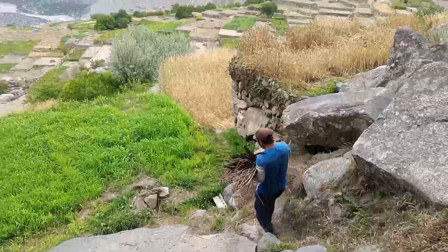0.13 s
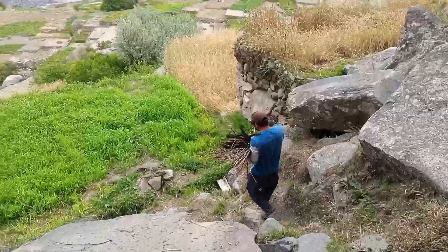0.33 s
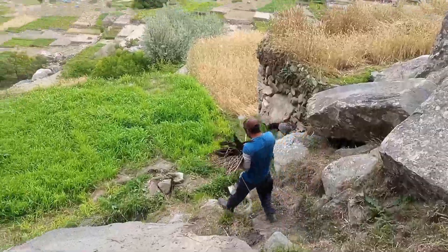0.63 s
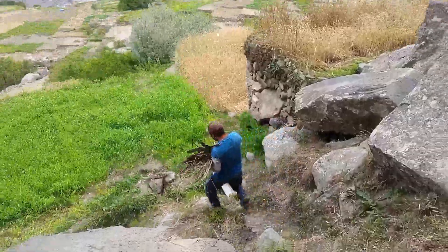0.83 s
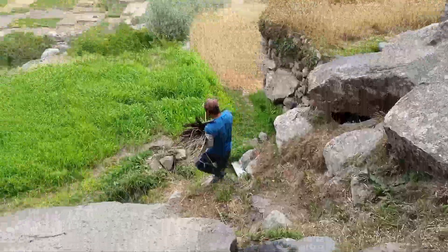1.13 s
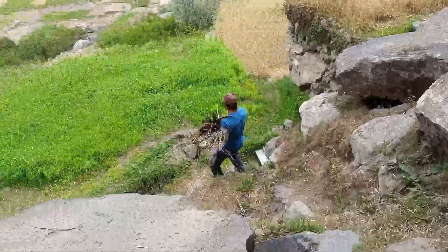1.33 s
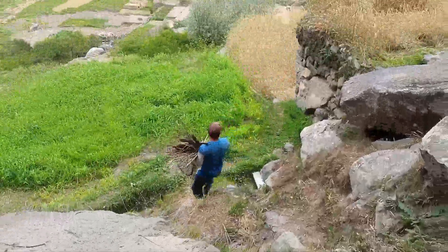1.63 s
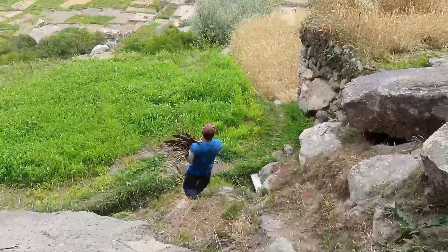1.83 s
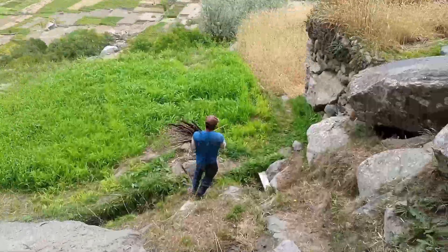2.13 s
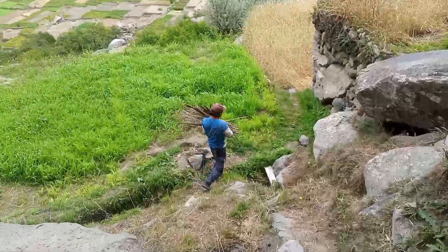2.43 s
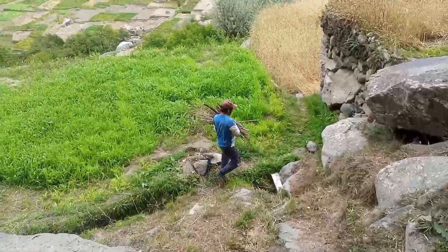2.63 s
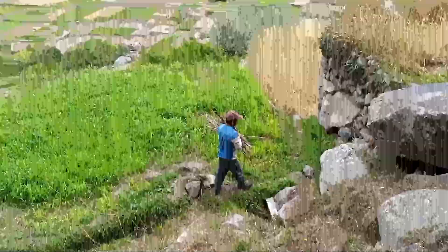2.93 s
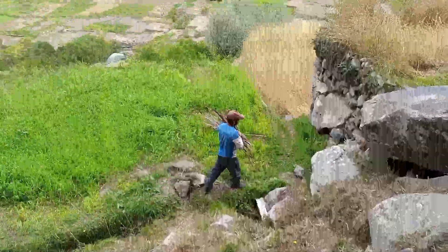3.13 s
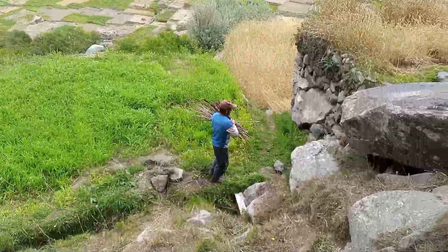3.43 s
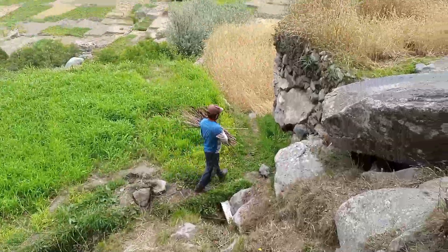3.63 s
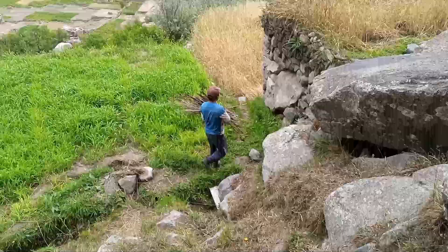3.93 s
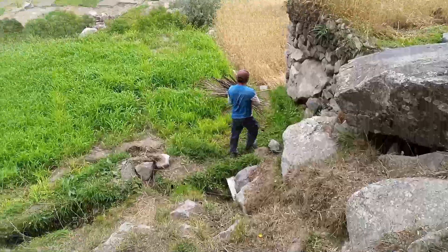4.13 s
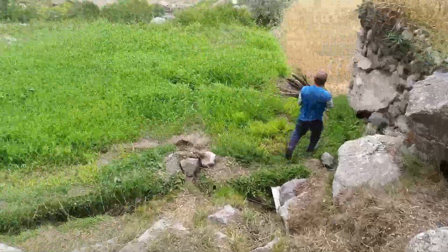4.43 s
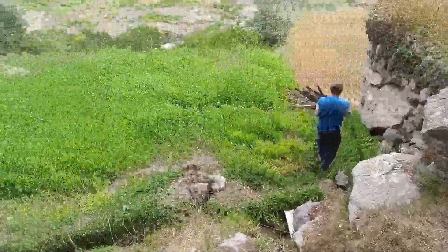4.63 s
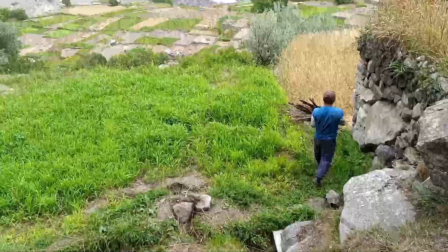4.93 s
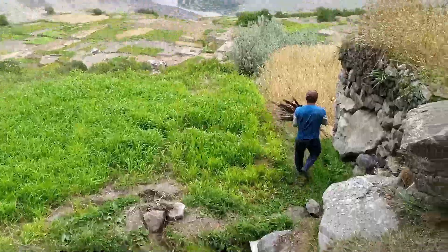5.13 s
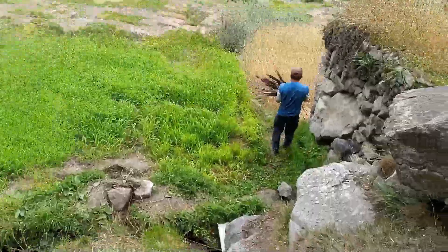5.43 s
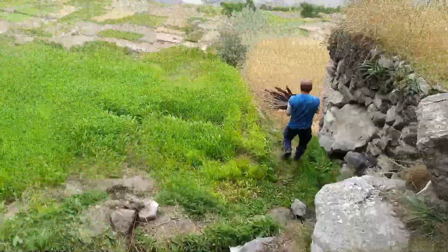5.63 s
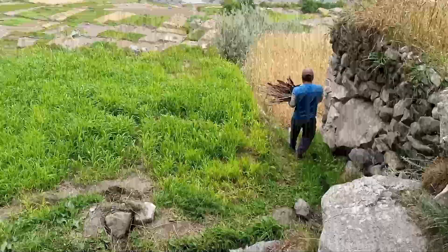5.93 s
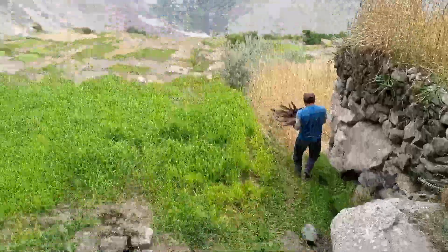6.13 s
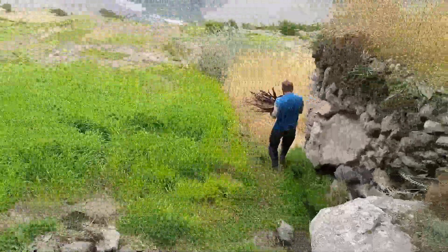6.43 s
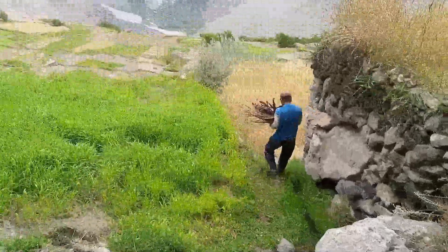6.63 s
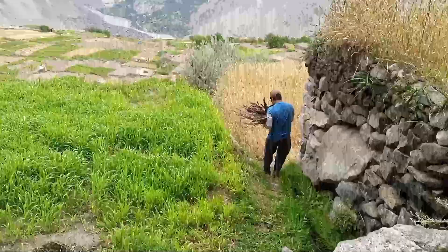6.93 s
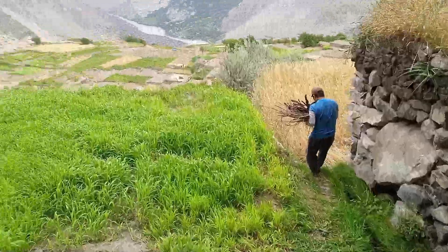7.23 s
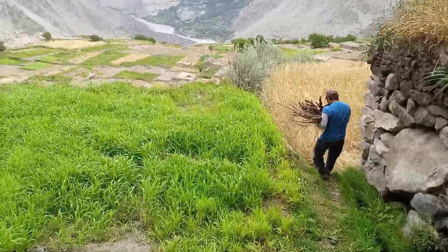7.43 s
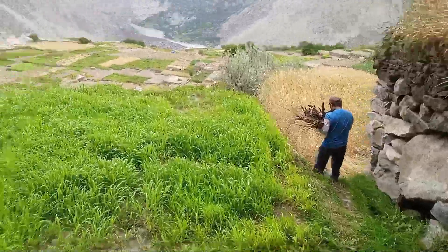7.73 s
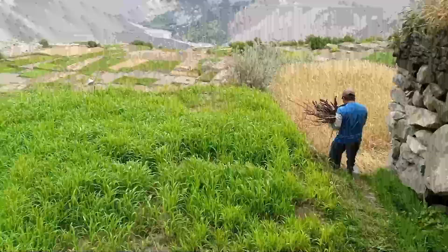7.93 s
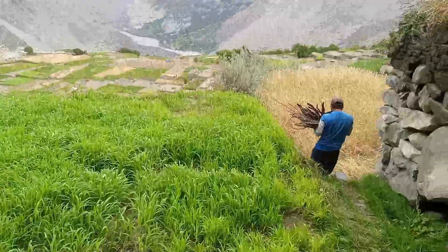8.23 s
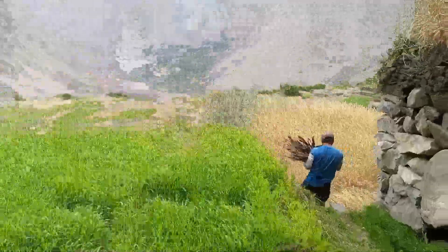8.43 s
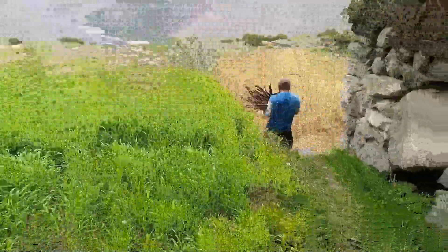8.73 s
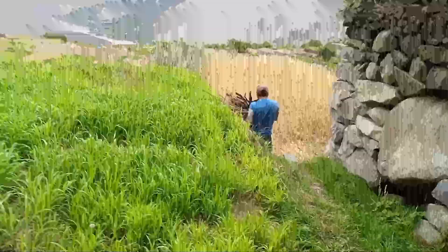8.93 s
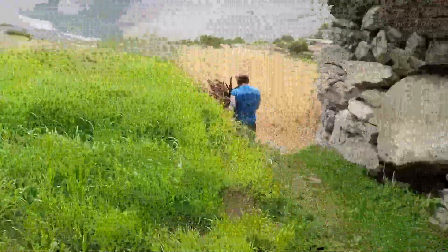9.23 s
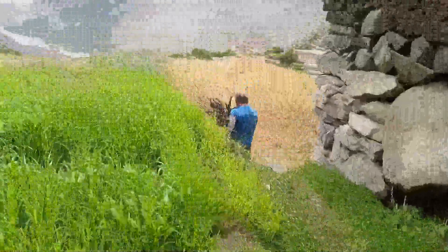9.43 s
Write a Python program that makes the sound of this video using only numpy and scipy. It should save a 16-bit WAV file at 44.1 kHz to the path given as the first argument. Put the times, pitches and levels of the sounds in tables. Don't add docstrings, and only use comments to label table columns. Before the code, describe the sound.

A close single microphone, handheld outdoors on a stony slope, with a very faint steady hush of distant wind and water. From 0 to 1.3 seconds, low footfall thumps and a handling shake mix with light dry scrapes and a sharp tick. From 1.4 to 2.9 it is nearly quiet, just thin grass rustle and one small twig snap. A pebble knocks at 2.9; from 3.5 stems flick, and from 4.2 to 4.7 they rasp and ring. Scrapes, small squeaks and dull knocks continue from 5, with a bright chattering drag around 5.9 and raking stalks from 6.3 to 6.9. At 7.05 comes the loudest, sharpest crack, a stiff stalk breaking. Twig snaps follow, a dry crunch at 7.8, then a cluster of knocks, thumps and crackles around 8.5. Rustling thickens into a full hiss by 9.5, with a heavy thump and knocks near 9.15.

```python
import sys
import numpy as np
from scipy import signal
from scipy.fft import rfft, irfft, next_fast_len
from scipy.io import wavfile
from scipy.ndimage import uniform_filter1d

SR = 44100
rng = np.random.default_rng(int(sys.argv[2]) if len(sys.argv) > 2 else 0)


def bounce(signal):
    frames = np.transpose(np.atleast_2d(signal))
    limited = np.clip(frames, -1, 1)
    pcm = np.round(limited * 32767).astype(np.int16)
    wavfile.write(sys.argv[1], SR, pcm)


def invert_db(level):
    return 10 ** (np.asarray(level, dtype=float) / 20)


N = 422919

# time in seconds, rustle level in dB, dry tips in dB above the rustle.
GRASS_BRUSH = [(0.1, -71.5, 2), (0.53, -58.5, -16), (0.96, -64, -1), (1.22, -65.5, 3), (1.75, -61.5, -19),
               (2.44, -66, -6), (4.15, -60, -26), (4.39, -60.5, 6), (4.84, -58, -9), (5.16, -56.5, -10),
               (5.72, -59, 9.5), (6.2, -56, -3), (6.5, -55, 5.5), (7.02, -55, -19), (7.26, -50, -5),
               (7.8, -53, 7), (8.51, -49, 2.5), (9.55, -45, -1)]
# frequency in Hz, density in dB per Hz.
BLADE_SPECTRUM = [(180, -12.5), (300, -13.5), (653, -7), (797, -9), (1170, -7), (1500, -5), (2150, -2.5),
                  (2500, -1.5), (5530, -3), (6640, -1.5), (7960, -6), (10400, -4), (13100, -16),
                  (14700, -10.5), (15700, -4)]
# time in seconds, fade in seconds, heavy blades in dB, dry tips in dB.
FLATTENED_TUFTS = [
    (1.33, 0.11, -67, -80),
    (4.39, 0.23, -67.5, -56),
    (5.16, 0.044, -51, -58),
    (6.62, 0.12, -59.5, -56),
    (7.07, 0.0084, -59, -51),
    (7.79, 0.04, -51, -44),
    (8.51, 1, -62.5, -64),
]
HEAVY_DB, HEAVY_FOLLOWS = -72, 0.61
SMOOTH_FROM_DB, SMOOTH_OVER_DB = -57.5, 10.5

# frequency in Hz, level in dB.
STALK_MODES = [
    [(4700, -6.5), (5800, -7), (6930, -1), (7580, -6), (9030, -3.5), (10100, -12), (14900, -7)],
    [(1750, -1.5), (2270, 3), (2690, 0.5), (3300, 3), (3720, 1), (4950, 3.5), (5780, 6.5), (6350, 2),
     (7000, -1), (10000, -1)],
    [(3490, 6), (3740, 4), (3990, 3.5), (4800, -7), (6610, -17), (8920, -2), (9520, -12), (10100, -8),
     (11000, -13)],
    [(3090, 1.5), (3500, 1.5), (3790, -2), (6520, -4), (7050, -1), (9160, -1.5), (10100, 3)],
    [(1780, -6), (2500, 2), (4010, 6), (7500, 0), (9350, 1), (15100, -1)],
    [(1530, -9), (2860, -5), (3995, 5), (4760, -8), (5780, -3), (2240, -9), (7100, -6), (9600, -6.5),
     (10300, -12), (10940, -8), (15000, -5)],
    [(1650, -3.5), (2200, 1), (2600, 3), (3980, 6.5), (5800, 2), (7000, -14), (15200, -13)],
    [(1500, 5), (2030, 1), (3000, 2), (2605, 5), (4280, 1), (5170, 1), (6660, 1), (8430, 3), (10800, -13),
     (12360, -6), (14500, 0), (15100, 4)],
    [(608, 3), (1640, 3), (3600, 3), (4000, 2), (5780, -4), (6590, 3)],
    [(1680, -7), (4111, 1), (4760, 7), (5600, -1), (7100, -8), (9300, -4), (10400, 3), (11000, 0)],
]
# strongest moment in seconds, length in seconds, level in dB, ringing share from 0 to 1.
STALK_DRAGS = [
    [(.05, 0.03, -53, 0.6), (.07, 0.053, -62, 0.3), (.122, 0.037, -59, .5), (.165, 0.069, -52.5, 0.4),
     (.275, 0.055, -59.5, 0.6), (.4, 0.26, -63.5, 0.5)],
    [(.685, 0.07, -52.5, 0.8), (.82, 0.28, -60.5, 0.2), (.965, 0.13, -58.5, 0.2), (1.095, 0.12, -62.5, 0.4),
     (1.162, 0.057, -52.5, 0.4)],
    [(3.59, 0.087, -52, 0.84), (3.67, 0.18, -66, 1)],
    [(4.197, 0.033, -56, 0.5), (4.415, 0.067, -57.5, 1), (4.35, 0.094, -63, 0.8), (4.494, 0.04, -55.5, 1),
     (4.575, 0.049, -52, 0.7), (4.675, 0.098, -58, 0.4)],
    [(5.125, 0.091, -52, 0.3), (5.395, 0.043, -63, 0.3), (5.7, 0.071, -62, 0.2)],
    [(5.905, 0.057, -49.5, 0.85), (6.02, 0.097, -50, 1)],
    [(6.38, 0.079, -59, 0.6), (6.57, 0.041, -52, 0.7), (6.8, 0.35, -60.5, 1)],
    [(7.038, 0.019, -45, 0.3), (7.064, 0.043, -36.5, 0.64), (7.091, 0.03, -41, 0.45)],
    [(8.55, 0.1, -46.5, 0.28), (8.475, 0.077, -47.5, 0.06), (9.145, 0.17, -54.5, 1)],
    [(5.72, 0.13, -55.5, 0.8), (5.64, 0.066, -55.5, 0), (5.77, .06, -57, .2)],
]
RISE_SHARE = 0.6
MODE_WIDTH_HZ, MODE_WIDENS = 43, 0.0083
MODE_SCATTER_DB = 3

# time in seconds, peak level in dB.
FLICK_SLIPS = [
    (.1166, -41),
    (.136, -41),
    (.16, -37),
    (.172, -38),
    (.186, -46),
    (.2683, -48),
    (.284, -49),
    (.395, -48),
]
COMB_SLIPS = [(.6714, -38), (.679, -41), (.70, -40), (.8584, -39), (.9078, -42), (.9358, -42), (.956, -41),
              (.99, -41), (1.0011, -38), (1.0485, -42), (1.0899, -43), (1.1408, -40), (1.166, -43)]
NUDGE_SLIPS = [(3.5253, -45), (3.5462, -42), (3.5717, -39), (3.581, -37), (3.591, -37), (3.601, -42),
               (3.666, -47), (3.7148, -38.5), (3.7832, -47), (3.8435, -47), (3.974, -41), (4.014, -45),
               (4.1374, -36)]
RASP_SLIPS = [(4.2633, -39), (4.2867, -36.5), (4.331, -36), (4.341, -35), (4.3705, -38), (4.3636, -37),
              (4.376, -36), (4.399, -41), (4.405, -40), (4.418, -40), (4.4434, -37), (4.4808, -36),
              (4.4923, -37), (4.5422, -40), (4.564, -37), (4.5726, -28.5), (4.58, -40), (4.623, -42),
              (4.6589, -43), (4.669, -44), (4.681, -45), (4.7013, -39)]
TUG_SLIPS = [(4.9878, -41), (5.021, -35), (5.0891, -35), (5.1035, -33), (5.145, -38), (5.197, -40),
             (5.212, -46), (5.315, -47), (5.3335, -39), (5.348, -42), (5.3854, -34), (5.408, -35.5),
             (5.4408, -41), (5.4632, -44)]
CHATTER_SLIPS = [(5.8747, -27), (5.892, -24.5), (5.899, -25), (5.9098, -26), (5.9215, -28), (5.9305, -26),
                 (5.9375, -27.5), (5.9695, -37), (5.9808, -29), (5.9963, -40), (6.008, -24), (6.0232, -27),
                 (6.0354, -25), (6.041, -24)]
RAKE_SLIPS = [(6.3308, -35), (6.372, -39), (6.3797, -40), (6.397, -41), (6.4446, -35), (6.5149, -33),
              (6.5545, -36), (6.5698, -28.5), (6.585, -33), (6.6416, -33.5), (6.6805, -33), (6.7025, -34),
              (6.7434, -37), (6.7723, -36), (6.79, -44), (6.8202, -34), (6.8626, -36), (6.903, -38),
              (6.917, -41)]
BREAK_SLIPS = [
    (7.0487, -36),
    (7.0525, -31),
    (7.056, -27),
    (7.0604, -24),
    (7.0645, -25),
    (7.0698, -25),
    (7.0842, -26.5),
    (7.0894, -28),
]
# slips, peak over rms in dB, ringing share from 0 to 1.
STALK_SLIPS = [(FLICK_SLIPS, 14, 0.68), (COMB_SLIPS, 14, 0.25), (NUDGE_SLIPS, 14, 0.45), (RASP_SLIPS, 14, 0.64),
               (TUG_SLIPS, 14, 0.3), (CHATTER_SLIPS, 14, 0.56), (RAKE_SLIPS, 14, 0.3), (BREAK_SLIPS, 10, 0.41)]

# time in seconds, peak level in dB, body frequency in Hz, tip frequency in Hz.
TWIG_SNAPS = [(1.969, -43, 4970, 9350), (2.968, -48, 1290, 8400), (3.742, -43.5, 1790, 10500),
              (3.869, -37, 2610, 7600), (3.883, -38.5, 3550, 6050), (3.905, -44, 3550, 10400),
              (4.005, -41.5, 4460, 5500), (4.2635, -43, 3800, 7400), (4.337, -37, 3860, 9900),
              (4.401, -40, 3770, 8640), (4.702, -43.5, 4000, 6170), (5.773, -44, 2570, 7000),
              (5.8527, -41, 2200, 10100), (6.123, -38, 2820, 6300), (6.38, -36, 4050, 7100),
              (6.5142, -41, 3970, 5710), (6.554, -35.5, 2470, 5650), (6.6816, -39.5, 4100, 7300),
              (7.223, -36.5, 2000, 6460), (7.3758, -33, 2000, 8670), (7.602, -39.5, 2010, 6610),
              (8.0485, -37.5, 2820, 6500), (8.347, -33.5, 3980, 6460), (9.279, -36, 4160, 5460),
              (9.3817, -34, 4530, 6440), (9.4195, -34, 3580, 6600)]
TWIG_CRACK_DB, TWIG_RUB_S = 1.5, 0.011
# time in seconds, peak level in dB, body frequency in Hz, rub time in seconds.
PEBBLE_KNOCKS = [(2.9335, -30.5, 2020, 0.0033), (4.057, -33.5, 4540, 0.018), (4.4433, -44, 3870, .009),
                 (5.1279, -33, 1050, 0.0049), (5.3016, -34.5, 1970, 0.024), (5.464, -30.5, 2370, 0.029),
                 (5.633, -32, 1660, 0.022), (5.7034, -34, 4130, .01), (6.57, -27, 3900, .004),
                 (6.8204, -34.5, 1410, 0.039), (7.3758, -37, 2020, 0.026), (7.782, -28, 1290, 0.015),
                 (8.26, -32, 3600, 0.003), (8.4554, -22, 1750, 0.0053), (8.5135, -30, 3480, .009),
                 (8.5373, -29, 1156, 0.019), (8.6764, -34, 3870, 0.0081), (9.141, -25.5, 1885, 0.003),
                 (9.17, -27.5, 3950, .009)]
PEBBLE_CRACK_DB, PEBBLE_TIP_HZ = -24, 5850
SNAP_WIDTH_HZ = 117

# start in seconds, end in seconds, first frequency in Hz, last frequency in Hz, level in dB.
SLIDING_SQUEAKS = [(5.137, 5.277, 1760, 1810, -56.5), (5.305, 5.35, 2200, 2350, -54.5),
                   (5.31, 5.395, 1850, 2100, -60.5), (4.99, 5.03, 2560, 2550, -63),
                   (5.497, 5.602, 4450, 4480, -64), (5.722, 5.8, 2533, 2500, -61),
                   (5.875, 5.928, 1000, 1200, -60.5), (5.965, 6.057, 1450, 1670, -52),
                   (6.44, 6.55, 4050, 3930, -62), (6.69, 6.93, 4150, 3950, -59.5),
                   (5.075, 5.14, 2750, 1950, -55.5), (7.03, 7.044, 2600, 2650, -41),
                   (7.085, 7.142, 1230, 1180, -54), (0.738, 0.884, 9800, 10000, -65),
                   (4.325, 4.46, 3890, 3800, -59), (1.07, 1.18, 3720, 3740, -64.5),
                   (0.81, .92, 2450, 2500, -65), (6.43, 6.58, 5300, 6300, -70),
                   (6.35, 6.405, 5900, 5850, -60), (6.36, 6.405, 4000, 4050, -60),
                   (4.29, 4.45, 3100, 3030, -64), (4.29, 4.35, 6050, 6100, -61),
                   (4.66, 4.71, 4100, 4100, -57), (9.1, 9.14, 600, 640, -54.5), (8.54, 8.6, 650, 590, -59),
                   (6.75, 6.85, 1900, 2200, -62), (8.64, 8.79, 1230, 1100, -59.5),
                   (4.63, 4.73, 1400, 1980, -67), (6.52, 6.62, 790, 690, -62.5),
                   (7.592, 7.64, 1100, 1080, -57)]
# start in seconds, end in seconds, frequency in Hz, level in dB.
STEADY_HUMS = [(.26, .46, 4720, -68.5), (.26, .39, 3580, -73), (.355, .395, 2070, -64.5),
               (.43, .5, 2050, -66), (.44, .5, 3680, -65), (.69, .78, 1736, -67), (.7, .77, 3700, -66),
               (.93, 1.02, 3480, -67), (.66, 0.713, 4960, -58), (4.485, 4.51, 830, -62.5),
               (4.655, 4.715, 1020, -65.5), (4.665, 4.71, 2590, -64), (4.84, 4.88, 2780, -66),
               (7.18, 7.233, 1250, -57.5), (7.255, 7.295, 3450, -59), (7.52, 7.648, 2030, -61),
               (7.376, 7.403, 2030, -46), (7.335, 7.383, 3300, -55), (4.102, 4.129, 1740, -51.5),
               (6.767, 6.804, 1647, -53), (7.8, 7.85, 530, -60), (7.99, 8.09, 2150, -63),
               (8.05, 8.1, 2830, -58.5), (8.04, 8.078, 1660, -60.5), (8.08, 8.13, 1230, -62.5),
               (8.19, 8.26, 1660, -62), (8.19, 8.29, 568, -65), (8.36, 8.42, 1167, -62),
               (9.45, 9.512, 800, -59.5), (8.93, 8.97, 1760, -54), (9.06, 9.105, 798, -59)]

# time in seconds, peak level in dB, frequency in Hz.
STRAW_TICKS = [(0.047, -27.5, 9800), (2.9338, -33, 2080), (2.9687, -41, 6350), (4.0046, -30.5, 5870),
               (4.336, -26, 10300), (5.128, -32.5, 1200), (5.3014, -38, 14500), (5.8748, -24, 10500),
               (5.8935, -24, 9600), (4.157, -44, 2440), (8.26, -31, 4700), (8.381, -37, 1800),
               (8.539, -32, 2800), (8.328, -30, 4500), (8.474, -31, 1500), (8.676, -35, 5500),
               (9.101, -34.5, 1380), (9.154, -37, 3200), (4.0565, -44, 4570), (5.8525, -40, 2250),
               (7.7868, -30.5, 1270), (6.009, -30, 4000), (7.0562, -11, 15000), (7.0613, -16.5, 10800),
               (7.0624, -13.5, 6700), (8.5126, -24, 5840), (8.5375, -37, 1080), (8.541, -32, 1510),
               (9.068, -28, 6700), (9.2095, -32, 6600), (9.237, -30, 6500), (9.2775, -28, 5670)]
TICK_S, TICK_CYCLES, TICK_ROUGH = 0.00035, 1.2, 0.35

# time in seconds, peak level in dB, frequency in Hz.
FOOT_THUMPS = [(0.02, -41, 88), (0.128, -50, 61), (0.627, -46, 88), (0.856, -41, 89.5), (.042, -42, 108),
               (1.063, -56, 70), (1.32, -56.5, 119), (1.76, -65, 70), (8.25, -62, 70), (6.204, -60.5, 158),
               (7.643, -52, 67.2), (8.37, -53, 77.5), (8.468, -52, 125), (8.53, -51, 154), (8.6, -56, 78.1),
               (8.891, -63, 100), (9.131, -36.5, 94.3), (9.228, -54, 61.6), (9.269, -56, 87),
               (9.381, -48.5, 113), (9.539, -55, 71.5)]
# time in seconds, peak level in dB, frequency in Hz.
HEEL_KNOCKS = [(0.222, -55, 238), (1.315, -53, 554), (1.34, -50.5, 224), (1.625, -64, 506),
               (1.656, -53, 230), (2.93, -59.5, 555), (5.126, -53, 782), (6.208, -58.5, 310),
               (6.834, -52, 623), (8.477, -44, 260), (8.538, -43.5, 577), (8.488, -44.5, 300),
               (8.56, -48.5, 251), (8.588, -47.5, 231), (8.981, -51.5, 590)]

# time in seconds, fade in seconds, rumble in dB, rub in dB.
GRIP_SHIFTS = [
    (0.0, 0.09, -48, -82),
    (.25, 0.052, -63, -69),
    (.95, 0.21, -67, -90),
    (5.27, 0.13, -71.5, -81),
    (6.24, 0.043, -64, -70),
    (7.74, 0.11, -76, -69),
    (8.52, 0.072, -58, -57),
    (9.16, 0.11, -75, -56),
    (9.42, 0.09, -63, -66),
]
RUMBLE_DB, RUB_DB, RUB_FOLLOWS = -89.5, -76, 0.087

# frequency in Hz, level in dB.
VALLEY_SPECTRUM = [(15, -27), (25, -19), (49, -16), (165, -3), (316, -9), (546, -2), (700, -8), (1100, -13),
                   (1500, -4.5), (1950, -6.5), (3300, -120)]
VALLEY_DB = -69.5
TOP_HZ = 15600


def grass():
    rustle_db, tips_db = read(GRASS_BRUSH)
    thick = np.clip((rustle_db - SMOOTH_FROM_DB) / SMOOTH_OVER_DB, 0, 0.9)
    thin_grass = level(patchy(contacts(700, 3.7, 0.0023, 0.9), 3.3), 0)
    dense_grass = level(patchy(contacts(2500, 4.9, 0.0012, 0.61), 2.95), 0)
    blend = np.sqrt(1 - thick) * thin_grass + np.sqrt(thick) * dense_grass
    heavy, rest = split(colour(blend, BLADE_SPECTRUM), 876)
    middle, tips = split(rest, 9970)

    bent, crushed = swells(FLATTENED_TUFTS)
    tips_gain = np.hypot(invert_db(rustle_db + tips_db), crushed)
    tips = level(tips, -4.0) * tips_gain * invert_db(0.43 * walk(30))
    heavy_gain = np.hypot(invert_db(HEAVY_DB + HEAVY_FOLLOWS * (rustle_db + 60.0)), bent)
    heavy = level(heavy, -6.0) * heavy_gain * invert_db(4.4 * walk(20))
    middle = level(middle, 0.022) * invert_db(rustle_db)
    return invert_db(1.0 * walk(14)) * (middle + tips + heavy)


def contacts(rate, scatter_db, tail_s, hiss):
    chance = rng.random(N)
    size = rng.exponential(size=N)
    noise = rng.standard_normal(N)
    hits = (chance < rate / SR) * invert_db(scatter_db * np.minimum(size, 4)) ** 2
    power = signal.lfilter([1], [1, -np.exp(-1 / (tail_s * SR))], hits)
    return noise * np.sqrt(power / power.mean() + hiss)


def patchy(x, patchy_db):
    spec = signal.stft(x, nperseg=512)[2]
    blots = uniform_filter1d(rng.standard_normal(spec.shape), size=2, axis=0)
    blots = uniform_filter1d(blots, size=8, axis=1)
    return signal.istft(spec * invert_db(patchy_db * blots / blots.std()), nperseg=512)[1][:N]


def stalks():
    out = np.zeros(N)
    chatter = contacts(400, 2.4, 0.0018, 0.9)
    cloth = split(colour(chatter, BLADE_SPECTRUM), 1280)[1]
    drags = [[(s - RISE_SHARE * span, s, s + (1 - RISE_SHARE) * span, db, share) for s, span, db, share in rows]
             for rows in STALK_DRAGS]
    for rows, (table, crest_db, share) in zip(drags, STALK_SLIPS):
        rows += slips(table, crest_db, share)

    for mode_rows, rows in zip(STALK_MODES, drags):
        modes = [(hz, MODE_WIDTH_HZ + MODE_WIDENS * hz, g) for hz, g in mode_rows]
        for start, top, end, db, share in rows:
            i, j = int(start * SR), int((end + 0.02) * SR)
            push = np.interp(np.arange(i, j) / SR, [start, top, end], [0, 1, 0]) ** 0.73
            share = np.clip(share, 0, 1)
            db = db + 10 * np.log10((end - start) * SR / (j - i))
            ringing = level(ring(modes, push * chatter[i:j], MODE_SCATTER_DB), db)
            rubbing = level(push * cloth[i:j], db)
            add(out, start, np.sqrt(share) * ringing + np.sqrt(1 - share) * rubbing)
    return out


def slips(table, crest_db, share):
    return [(s - 0.0012, s + 0.0016, s + 0.0043, db - crest_db, share) for s, db in table]


def ring(modes, push, scatter_db=0):
    out = 0
    for (hz, width_hz, gain_db), (lift, bend) in zip(modes, rng.standard_normal((len(modes), 2))):
        mode = signal.iirpeak(hz * (1 + 0.01 * bend), hz / (1.3 * width_hz + 0.014 * hz + 40), SR)
        answer = signal.lfilter(*mode, signal.lfilter(*mode, push))
        out = out + invert_db(gain_db + scatter_db * lift) / np.sqrt(width_hz) * answer
    return out


def snaps():
    out, t = np.zeros(N), np.arange(2048) / SR
    rows = [(*row, TWIG_CRACK_DB, TWIG_RUB_S) for row in TWIG_SNAPS]
    rows += [(s, db, hz, PEBBLE_TIP_HZ, PEBBLE_CRACK_DB, rub_s) for s, db, hz, rub_s in PEBBLE_KNOCKS]
    noise = rng.standard_normal((len(rows), len(t)))
    tear = t / 0.0018 * np.exp(-t / 0.001) + 0.3 * np.exp(-t / 0.009)
    for (s, db, body_hz, tip_hz, crack_db, rub_s), hiss in zip(rows, noise):
        rub = tear + 0.5 * (1 - np.exp(-t / 0.0017)) * np.exp(-(t / rub_s) ** 2)
        body = level(ring([(body_hz, SNAP_WIDTH_HZ, 0)], hiss * rub), db - 26.5)
        thud = level(ring([(body_hz, 0.65 * body_hz, 0)], hiss * tear), db - 30.5)
        tip = level(ring([(tip_hz, 150, 0)], hiss * rub), db + crack_db - 24.0)
        crack = level(colour(split(hiss, 3800)[1] * tear, BLADE_SPECTRUM), db + crack_db - 18.0)
        add(out, s - 0.0006, body + thud + tip + crack)
    return out


def squeaks():
    out = np.zeros(N)
    slow = uniform_filter1d(uniform_filter1d(rng.standard_normal((2, N)), size=190), size=190)
    rub = slow * uniform_filter1d(np.abs(contacts(220, 1.6, 0.0044, 0.74)), size=128)
    steady = [(start, end, hz, hz, db) for start, end, hz, db in STEADY_HUMS]
    for start, end, from_hz, to_hz, db in SLIDING_SQUEAKS + steady:
        i, j = int(start * SR), int(end * SR)
        phase = 2 * np.pi * np.cumsum(np.linspace(from_hz, to_hz, j - i)) / SR
        note = rub[0, i:j] * np.sin(phase) + rub[1, i:j] * np.cos(phase)
        add(out, start, level(note * np.hanning(j - i) ** 0.15, db))
    return out


def ticks():
    out, t = np.zeros(N), np.arange(512) / SR
    noise = rng.standard_normal((len(STRAW_TICKS), len(t)))
    for (s, db, hz), hiss in zip(STRAW_TICKS, noise):
        rough = level(band(hiss, 1.03 * hz, min(1.6 * hz, 0.45 * SR)), 0)
        wave = np.sin(2 * np.pi * hz * t) + TICK_ROUGH * rough
        fade = (1 - np.exp(-t / 0.0001)) * np.exp(-t / (TICK_S + TICK_CYCLES / hz))
        add(out, s, invert_db(db + 2.5) * wave * fade)
    return out


def bumps(table, length, rough):
    out, t = np.zeros(N), np.arange(int(6 * length * SR)) / SR / length
    noise = rng.standard_normal((len(table), len(t)))
    for (s, db, hz), hiss in zip(table, noise):
        uneven = level(band(hiss, 0.6 * hz, 1.8 * hz), -4.5)
        wave = np.sin(2 * np.pi * hz * length * t) + rough * uneven
        add(out, s - 0.5 * length, invert_db(db - 0.5) * wave * (t * np.exp(1 - t)) ** 2)
    return out


def grip():
    shake, slide = swells(GRIP_SHIFTS)
    rumble = level(band(rng.standard_normal(N), 44, 119), 0.99)
    rumble = rumble * np.hypot(invert_db(RUMBLE_DB), shake) * invert_db(6.0 * walk(25))
    steady = invert_db(RUB_DB + RUB_FOLLOWS * (read(GRASS_BRUSH)[0] + 54.5))
    rub = level(band(rng.standard_normal(N), 156, 378), -1.7)
    return rumble + rub * np.hypot(steady, slide) * invert_db(3.2 * walk(40))


def valley():
    return level(colour(rng.standard_normal(N), VALLEY_SPECTRUM), VALLEY_DB - 3.0) * invert_db(1.0 * walk(2.3))


def level(x, db):
    return x * invert_db(db) / np.sqrt(np.mean(x ** 2) + 1e-30)


def colour(x, points):
    hz, db = np.transpose(points)
    size = next_fast_len(len(x))
    f = np.maximum(np.arange(size // 2 + 1) * SR / size, 1)
    gain = invert_db(np.interp(np.log(f), np.log(hz), db))
    return irfft(rfft(x, size) * gain, size)[:len(x)]


def band(x, lo_hz, hi_hz):
    return signal.sosfilt(signal.butter(2, [lo_hz, hi_hz], "band", fs=SR, output="sos"), x)


def split(x, edge_hz):
    size = next_fast_len(len(x))
    f = np.arange(size // 2 + 1) * SR / size
    low = irfft(rfft(x, size) / (1 + (f / edge_hz) ** 4), size)[:len(x)]
    return low, x - low


def walk(rate):
    k = int(SR / rate)
    held = rng.standard_normal(size=1024)[np.arange(N) // k]
    return uniform_filter1d(uniform_filter1d(held, k), k)


def read(table):
    s, *columns = np.transpose(table)
    return [np.interp(np.arange(N) / SR, s, c) for c in columns]


def swells(table):
    t = np.arange(N) / SR
    power = sum(invert_db(np.array(db))[:, None] ** 2 * np.exp(-2 * np.abs(t - s) / fade_s) for s, fade_s, *db in table)
    return np.sqrt(power)


def add(out, s, piece):
    i = max(int(s * SR), 0)
    out[i:i + len(piece)] += piece[:N - i]


def scene():
    plants = grass() + stalks() + snaps() + squeaks() + ticks()
    steps = bumps(FOOT_THUMPS, 0.016, 0.44) + bumps(HEEL_KNOCKS, 0.0089, 0.9)
    mono = plants + steps + grip() + valley()
    return np.array([mono, mono])


def roll_off(x):
    return signal.sosfilt(signal.butter(12, 16650, fs=SR, output="sos"), x)


def record(dry):
    thin = signal.sosfilt(signal.butter(2, 45, "high", fs=SR, output="sos"), dry)
    cut = signal.sosfilt(signal.ellip(8, 0.2, 52, TOP_HZ, fs=SR, output="sos"), thin)
    return roll_off(cut)


dry = scene()
out = record(dry)
bounce(out)
```